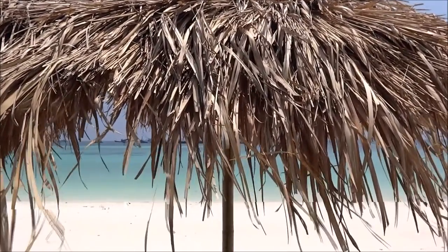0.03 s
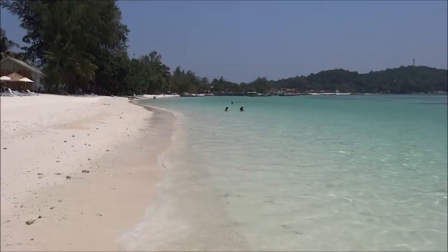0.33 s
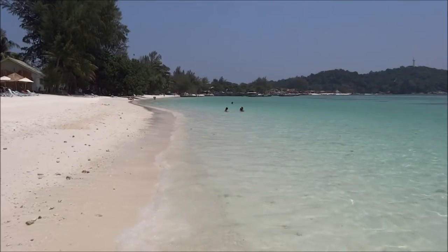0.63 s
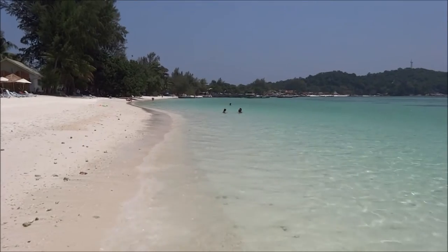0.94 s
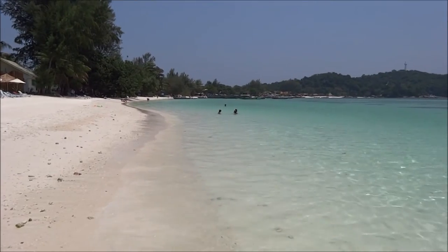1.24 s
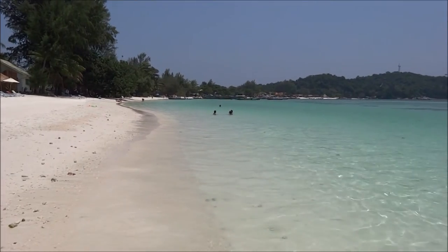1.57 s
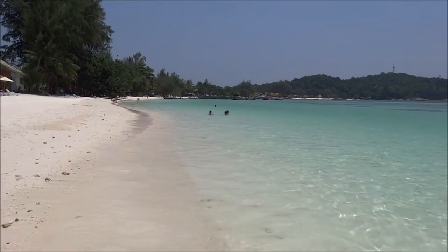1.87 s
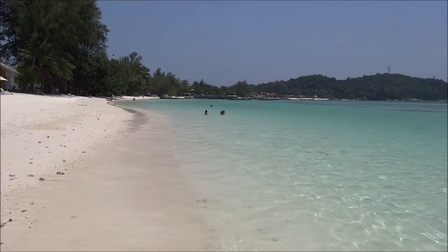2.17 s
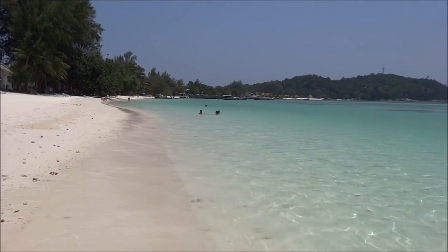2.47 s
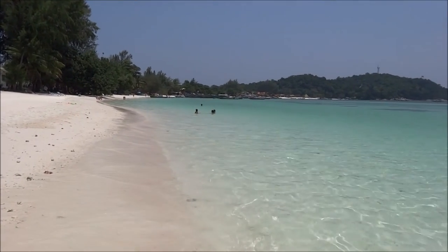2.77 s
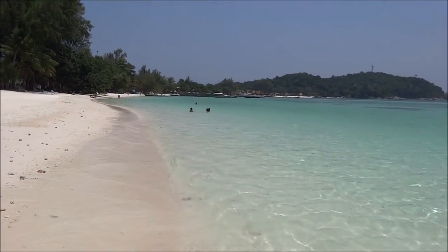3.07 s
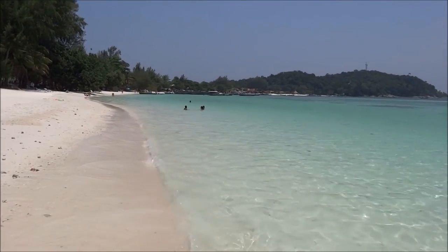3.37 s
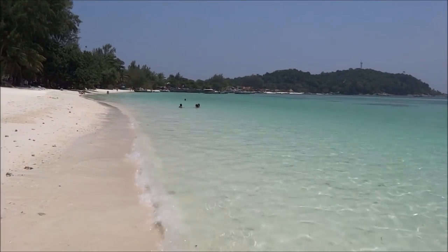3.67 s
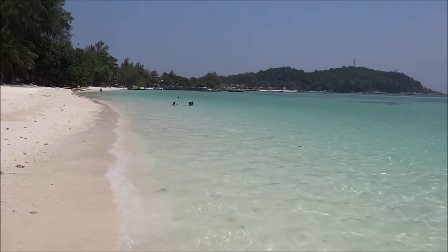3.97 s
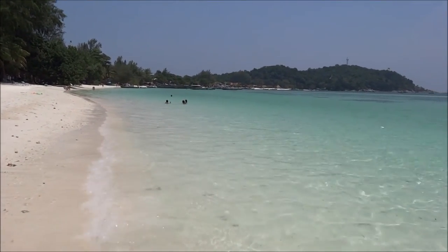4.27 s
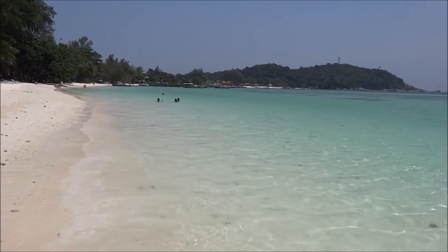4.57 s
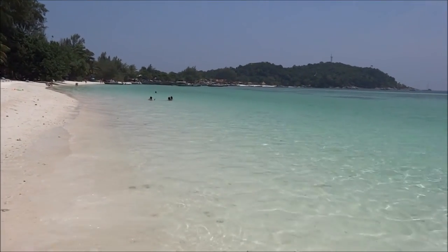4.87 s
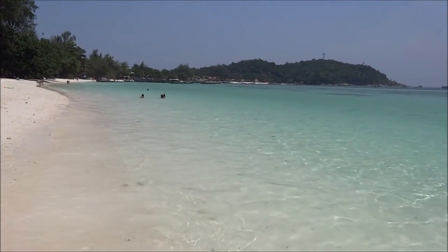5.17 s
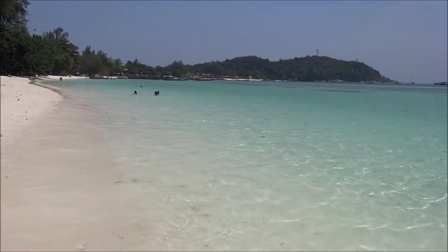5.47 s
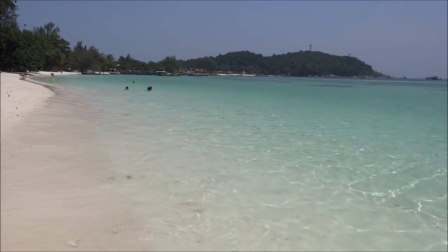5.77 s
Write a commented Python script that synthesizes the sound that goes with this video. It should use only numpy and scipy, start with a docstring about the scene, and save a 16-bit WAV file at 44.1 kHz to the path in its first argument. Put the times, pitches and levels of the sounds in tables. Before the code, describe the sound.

After a brief silence, a small wave comes in at about 0.6 seconds, gurgling on a sandy shore and draining away into a faint fizz, with a few plops around 1.2 seconds. Wind buffets the microphone in low, uneven rumbles, with soft thumps, strongest from about 1.5 to 3 seconds. From 2.4 seconds the water grows closer and livelier, with drips, bubbly plops and short bright slaps as the next wave curls over. The wind drops back as this wave breaks between about 3.5 and 4 seconds with a splash and a churning gurgle, then runs up the sand as fine hissing foam. The fizz soaks away by about 5 seconds, with a few small plops. Lighter gusts return from 5.1 seconds over quiet lapping and trickling, until the end near 5.8 seconds.

```python
"""Small waves lap on a sandy beach: one drains away, the next curls over with a few plops,
breaks and runs up the sand as fizzing foam. The water sounds through swarms of ringing
bubbles, from large gurgling ones to the finest in the foam; the crest's slaps throw spray.
Gusts of wind buffet the two ports of a microphone with rumbling eddies and a few thumps."""
import sys
import numpy as np
from scipy import signal
from scipy.fft import rfft, irfft, next_fast_len
from scipy.io import wavfile

SR = 44100
rng = np.random.default_rng(int(sys.argv[2]) if len(sys.argv) > 2 else 0)


def materialize(psi):
    """Save the field psi as 16-bit PCM at rate SR to the path in sys.argv[1].

    A 1-D psi becomes a single channel; in a 2-D psi each row is a channel.
    """
    bounded = np.clip(np.atleast_2d(psi).T, -1, 1)
    quanta = np.round(bounded * 32767).astype(np.int16)
    wavfile.write(sys.argv[1], SR, quanta)


N = 256220
TIME_S = np.arange(N) / SR
START_S, FADE_S, CUTOFF_HZ = 0.5798, 0.05, 15800
WAVE_SHAPE, GUST_SHAPE = 1.72, 1.68  # 2 is a round bell; less is more pointed

# Waves swell, spill and run out. Each row: crest time in seconds, relative level in dB,
# rise and fall in seconds, foaminess in dB.
WAVES = [(0.75, -23, 0.2, 0.6, -0.36), (2.53, -37, 0.016, 0.14, -1), (2.72, -27.5, .06, 0.13, -3),
         (3.24, -22, 0.3, 0.035, -3.5), (3.48, -26, 0.11, .05, -12), (3.89, -20.5, 0.44, 0.43, 2.6),
         (5.57, -37.5, 0.2, 0.51, 0)]
# Foam soaking into the sand. Each row: peak time in seconds, level in dB, rise and fall in seconds.
FOAM_SOAKS = [(1.4, -43, 0.3, 0.35), (4.75, -44.5, 0.12, 0.44)]
# Air folded in by the crest. Each row: peak time in seconds, level in dB, rise and fall in seconds.
AIR_CLOUDS = [(3.56, -23, 0.11, 0.14), (3.93, -21.5, 0.054, 0.04), (4.12, -29, 0.11, 0.36),
              (4.93, -35.5, .06, 0.039)]
# The largest plops and drips. Each row: start in seconds, relative level in dB, initial pitch in Hz.
PLOPS = [(1.158, -14, 2120), (1.201, -9.5, 1440), (1.204, -14, 2140), (1.206, -11.5, 3380),
         (2.52, -17, 1440), (2.672, -17, 2290), (2.796, -12.5, 2630), (3.138, -11, 1670),
         (3.167, -11, 1190), (3.182, -10.5, 1380), (3.224, -3, 5330), (3.273, -12, 1970),
         (3.281, -1.5, 1140), (3.324, -11, 1490), (3.475, -6.5, 2530), (3.832, -3, 1880),
         (4.465, -19, 1960), (4.511, -19, 960), (4.881, -24, 970), (4.935, -30, 766), (5.510, -12.5, 1580)]
# Slaps of the curling crest. Each row: start in seconds, level in dB.
SLAPS = [(1.158, -33), (1.201, -32), (2.372, -32), (2.713, -24), (2.752, -37), (2.795, -22), (3.224, -31),
         (3.256, -20), (3.488, -14.5), (3.915, -18), (4.513, -25)]
# Nearness of the water's edge. Each row: time in seconds, boost of single bubbles over hiss in dB.
NEARNESS = [(.6, -1), (1.5, -10), (2.4, -5), (2.7, 0), (3.3, 3), (3.7, -0.5), (4.2, -4.5), (4.7, -2.5),
            (5.0, -9.5), (5.8, -3)]
# Direction of the splashing. Each row: time in seconds, left minus right in dB.
SPLASH_PAN = [(.6, 2.5), (2.4, 3.5), (2.7, 0), (3.25, -3), (3.6, -0.5), (4.5, 3), (5.8, 4.5)]
# Source spectra. Each row: frequency in Hz, relative spectral density in dB.
GURGLE_SPECTRUM = [(150, -20.5), (350, -7), (600, -1), (1000, -0.5), (1700, -2), (2400, -5.5), (3200, -9.5),
                   (4500, -26.5), (7000, -75)]
SPLASH_SPECTRUM = [(1800, -43), (3000, -5.5), (3800, -3), (5200, -6.5), (7000, -9.5), (9000, -14),
                   (13000, -34)]
FOAM_SPECTRUM = [(5000, -22), (7000, 0), (8500, 0.5), (10000, 2.5), (12000, 1), (14300, 2.5), (15200, -5),
                 (16000, -18)]
CHURN_SPECTRUM = [(250, -15), (450, -10.5), (720, 3), (950, -1), (1400, -35), (2500, -29)]
SPRAY_SPECTRUM = [(600, 15), (1500, -2.5), (3000, 16.5), (6000, 4), (10000, 2.5), (15000, -14)]
TRICKLE_SPECTRUM = [(700, -2), (1500, -1), (2700, -2.5), (4000, -18)]
WIND_SPECTRUM = [(20, -34), (45, -21), (80, -10.5), (140, -2), (220, 0.5), (300, 0), (420, -4.5),
                 (600, -11.5), (1000, -24), (2000, -40), (5000, -52)]
# Gusts. Each row: peak time in seconds, relative level in dB, rise (equal to fall) in seconds.
GUSTS = [(0.89, -18.5, 0.31), (1.56, -17.5, 0.26), (1.829, -17, 0.064), (2.19, -17.5, 0.33),
         (2.52, -24.5, 0.097), (2.755, -20, 0.07), (2.925, -20, 0.24), (3.169, -20.5, .1),
         (3.43, -31, 0.11), (3.83, -31.5, 0.081), (4.2, -34, 0.16), (4.65, -33, 0.15), (5.11, -23, 0.053),
         (5.54, -23, 0.26), (5.77, -21.5, 0.078)]
# The hardest eddies. Each row: peak time in seconds, mid peak in dB, pitch in Hz.
THUMPS = [(0.73, -7, 338), (1.553, 1.5, 334), (1.586, -4, 434), (1.828, 0.5, 200), (1.858, -1, 362),
          (2.084, -2, 360), (2.179, -2, 380), (2.326, -6, 527), (2.741, -4, 240), (2.756, -2, 273),
          (2.939, -0.5, 266)]
# Wind difference between the ports. Each row: frequency in Hz, side minus mid in dB.
WIND_SIDE = [(60, -15), (120, -7.5), (200, -5), (320, -1.5), (600, 0.5), (1500, 2.5)]
# Steadiness of the left-to-right airflow. Each row: time in seconds, share from 0 to 1.
CROSSWIND = [(.6, 0.4), (1.2, 0.5), (1.5, 0), (2.4, 0), (2.75, 0.8), (3.3, 1), (4.4, 0.8), (5.1, 1),
             (5.8, 1)]


def waves():
    """Four sizes of bubble follow swell, break and run-up; the splash is the most directional."""
    return panned(gurgle(), share=0.4) + panned(splash()) + foam() + churn()


def gurgle():
    """Large bubbles ring as a wave spills."""
    gain = spill_gain(level_db=1.5, fineness=0, linger_db=-6.5, life_s=0.14, lapping_db=-35.5)
    return gain * water(GURGLE_SPECTRUM, per_s=900, cycles=22.5, spread_db=2.5,
                        far_db=4.5, lumpy_db=1.33, width=0.2)


def splash():
    """Smaller bubbles ring higher and linger longer."""
    gain = spill_gain(level_db=-6.5, fineness=0.76, linger_db=-9.5, life_s=0.28, lapping_db=-46)
    return gain * water(SPLASH_SPECTRUM, per_s=1400, cycles=31, spread_db=3,
                        far_db=2.5, lumpy_db=0.98, width=0.38)


def foam():
    """The finest bubbles fizz in each run-up and as the foam soaks into the sand."""
    run_up = spill_gain(level_db=-11.5, fineness=1, linger_db=-4, life_s=0.31, lapping_db=-53.5)
    soak_power = sum(swell_power(*soak, WAVE_SHAPE) for soak in FOAM_SOAKS)
    gain = np.sqrt(run_up ** 2 + soak_power)
    return gain * water(FOAM_SPECTRUM, per_s=2200, cycles=31, spread_db=3.5,
                        far_db=-1.5, lumpy_db=1.05, width=0.017)


def churn():
    """A breaking crest folds in a cloud of air that churns."""
    gain = np.sqrt(sum(swell_power(*cloud, WAVE_SHAPE) for cloud in AIR_CLOUDS))
    return gain * water(CHURN_SPECTRUM, per_s=470, cycles=7.5, spread_db=4,
                        far_db=-2.5, lumpy_db=4.5, width=0.058)


def spill_gain(level_db, fineness, linger_db, life_s, lapping_db):
    """Spills make bubbles over steady lapping, foamy spills more fine ones; some burst later."""
    spill = sum(swell_power(peak_s, db + fineness * foamy_db, rise_s, fall_s, WAVE_SHAPE)
                for peak_s, db, rise_s, fall_s, foamy_db in WAVES)
    pole = np.exp(-1 / (life_s * SR))
    late = from_db(linger_db) ** 2 * signal.lfilter([1 - pole], [1, -pole], spill + 1e-18)
    return np.hypot(from_db(level_db) * np.sqrt(spill + late), from_db(lapping_db))


def water(spectrum, per_s, cycles, spread_db, far_db, lumpy_db, width):
    """Near bubbles stand out of the hiss of countless far ones; both come in spurts."""
    near_gain = from_db(curve(NEARNESS) - far_db)
    mid, side = coloured(rng.standard_normal((2, N)), spectrum)
    far = unit_rms(stereo(mid, side * width / np.sqrt(3)))
    near = swarm(spectrum, per_s, cycles, spread_db, width)
    blend = (near_gain * near + far) / np.hypot(near_gain, 1)
    return unit_rms(blend * from_db(lumpy_db * drift(rate_hz=18.7)))


def swarm(spectrum, per_s, cycles, spread_db, width):
    """Bubbles of random moment, strength and place, their pitches drawn from a spectrum."""
    grid_hz = np.linspace(200, CUTOFF_HZ, 2000)
    cumulative = np.cumsum(gain_at(spectrum, grid_hz) ** 2)
    swarm_rng = np.random.default_rng(rng.integers(2 ** 31))
    when, pitch, strength, place = swarm_rng.random((int(per_s * N / SR), 4)).T[:, :, None]
    hz = np.interp(pitch, cumulative / cumulative[-1], grid_hz)
    boost_db = spread_db * np.minimum(-np.log(1 - strength), 4)
    height = np.sqrt(hz) * from_db(boost_db)  # short, high rings carry as much energy as low ones
    steps = np.arange(int(cycles * SR / np.quantile(hz, 0.1)))
    rings = height * bubble(steps / SR, hz, t60_s=cycles / hz, rise=0.048)
    indices = ((when * N).astype(int) + steps).ravel()
    pan = width * (2 * place - 1)
    mid = np.bincount(indices, rings.ravel(), N)[:N]
    side = np.bincount(indices, (rings * pan).ravel(), N)[:N]
    return unit_rms(stereo(mid, side))


def bubble(age_s, hz, t60_s, rise):
    """A bubble rings and dies, its pitch rising as it nears the surface."""
    return from_db(-60 * age_s / t60_s) * np.sin(2 * np.pi * hz * age_s * (1 + rise * age_s / t60_s))


def plops(gentle_cycles, loss_per_s, attack_s, rise, ragged_depth, ragged_hz):
    """Folding water pinches off bubbles that ring raggedly, small or violent ones most briefly."""
    out = np.zeros((2, N))
    raggedness = 1 + ragged_depth * drift(ragged_hz)
    for start_s, db, hz in PLOPS:
        t60_s = 1 / (hz / gentle_cycles + loss_per_s * from_db(db))
        start = int(start_s * SR)
        age_s = TIME_S[:min(int(2 * t60_s * SR), N - start)]
        attack = 1 - np.exp(-age_s / attack_s)
        out[:, start:start + len(age_s)] += from_db(db) * attack * bubble(age_s, hz, t60_s, rise)
    return panned(out * raggedness)


def slaps(t60_s):
    """Each slap of the crest throws a short, bright burst of dense droplets."""
    gain = np.zeros(N)
    for start_s, db in SLAPS:
        start = int(start_s * SR)
        gain[start:] += from_db(db - 60 * TIME_S[:N - start] / t60_s)
    return gain * water(SPRAY_SPECTRUM, per_s=4000, cycles=7, spread_db=2,
                        far_db=0, lumpy_db=0.6, width=0.35)


def trickle(level_db):
    """Stray bubbles plink close by throughout, heard when the wash is quiet."""
    return from_db(level_db) * swarm(TRICKLE_SPECTRUM, per_s=45, cycles=48, spread_db=3, width=0.89)


def wind(gain_db, lumpy_db, eddy_hz, knee_hz, brighten_db_per_db, neutral_db):
    """Eddies buffet the two ports; strong gusts shed smaller eddies."""
    force_db = wind_force_db(breeze_db=-40.5, wander_db=3.5)
    across = np.clip(curve(CROSSWIND), 0, 1)
    eddies = rng.standard_normal((2, N)) * from_db(lumpy_db * drift(eddy_hz))
    mid, swirl = coloured(eddies, WIND_SPECTRUM)
    # Eddies crossing left to right put the side a quarter cycle ahead of the mid.
    ahead = -signal.hilbert(mid, next_fast_len(N)).imag[:N]
    side = coloured(across * ahead + np.sqrt(1 - across ** 2) * swirl, WIND_SIDE)
    ports = stereo(mid, side) / np.std(mid)
    large = signal.sosfiltfilt(signal.butter(2, knee_hz, fs=SR, output="sos"), ports)
    small = (ports - large) * from_db(brighten_db_per_db * np.maximum(force_db - neutral_db, -3))
    return from_db(gain_db + force_db) * (large + small)


def wind_force_db(breeze_db, wander_db):
    """Gusts come and go over a wandering breeze."""
    breeze = from_db(breeze_db + wander_db * drift(rate_hz=12)) ** 2
    gusts = sum(swell_power(peak_s, db, rise_s, rise_s, GUST_SHAPE) for peak_s, db, rise_s in GUSTS)
    return 10 * np.log10(breeze + gusts)


def thumps(lean):
    """A passing eddy is one pressure hump between two dips, harder on one port."""
    out = np.zeros((2, N))
    for (peak_s, db, hz), port in zip(THUMPS, rng.choice([-1, 1], len(THUMPS))):
        span = slice(int((peak_s - 0.01) * SR), int((peak_s + 0.01) * SR))
        phase = np.pi * hz * (TIME_S[span] - peak_s)
        hump = from_db(db) * (1 - 2 * phase ** 2) * np.exp(-phase ** 2)
        out[:, span] += stereo(hump, hump * lean * port)
    return out


def swell_power(peak_s, db, rise_s, fall_s, shape):
    """Power that builds to a peak and dies down."""
    width_s = np.where(TIME_S < peak_s, rise_s, fall_s)
    return from_db(db) ** 2 * np.exp(-2 * (np.abs(TIME_S - peak_s) / width_s) ** shape)


def drift(rate_hz):
    """Smooth random motion of unit rms."""
    hop, warm_up = 20, 4000
    pole = np.exp(-2 * np.pi * rate_hz * hop / SR)
    noise = rng.standard_normal(N // hop + warm_up + 2)
    slow = signal.lfilter([1], [1, -2 * pole, pole * pole], noise)[warm_up:]
    return np.interp(np.arange(N) / hop, np.arange(len(slow)), unit_rms(slow))


def coloured(x, spectrum):
    """Filter by a spectrum."""
    size = next_fast_len(N)
    gain = gain_at(spectrum, np.fft.rfftfreq(size, 1 / SR))
    return irfft(rfft(x, size) * gain, size)[..., :N]


def gain_at(spectrum, hz):
    """Gain on a log-frequency axis, falling 12 dB per octave past the ends."""
    points_hz, db = np.transpose(spectrum)
    inside_hz = np.clip(hz, points_hz[0], points_hz[-1])
    skirt = np.minimum(hz / inside_hz, inside_hz / (hz + 1e-9)) ** 2
    return from_db(np.interp(np.log(inside_hz), np.log(points_hz), db)) * skirt


def panned(ports, share=1):
    """Lean toward the splashing."""
    left_db = share * curve(SPLASH_PAN)
    return ports * from_db(np.array([left_db, -left_db]) / 2)


def stereo(mid, side):
    return np.array([mid + side, mid - side])


def curve(rows):
    return np.interp(TIME_S, *np.transpose(rows))


def unit_rms(x):
    return x / np.sqrt(np.mean(x ** 2) + 1e-20)


def from_db(db):
    return 10 ** (np.asarray(db) / 20)


def scene():
    """The shore in front, wind on the microphone; bubbles carry no deep bass."""
    shore = waves()
    shore += plops(gentle_cycles=53, loss_per_s=64, attack_s=0.00032, rise=0.068,
                   ragged_depth=0.64, ragged_hz=452)
    shore += slaps(t60_s=0.035) + trickle(level_db=-42)
    shore = signal.sosfilt(signal.butter(2, 220, "high", fs=SR, output="sos"), shore)
    buffet = wind(gain_db=2.21, lumpy_db=2, eddy_hz=76, knee_hz=398,
                  brighten_db_per_db=1.14, neutral_db=-19)
    return shore + buffet + thumps(lean=0.26)


def record(dry):
    """Fade in from silence, round the highest peaks, cut the top."""
    faded = dry * np.clip((TIME_S - START_S) / FADE_S, 0, 1)
    rounded = faded / (1 + faded ** 6) ** (1 / 6)
    return signal.sosfilt(signal.ellip(12, 0.1, 90, CUTOFF_HZ, fs=SR, output="sos"), rounded)


dry = scene()
out = record(dry)
materialize(out)
```